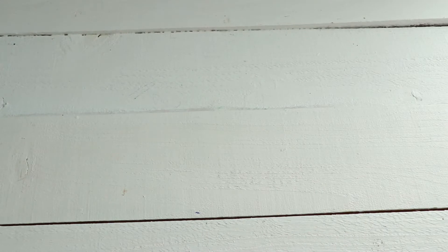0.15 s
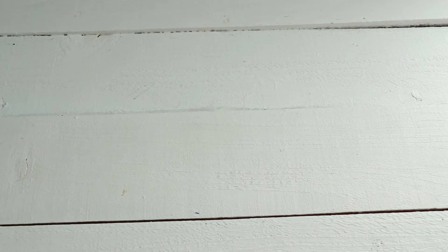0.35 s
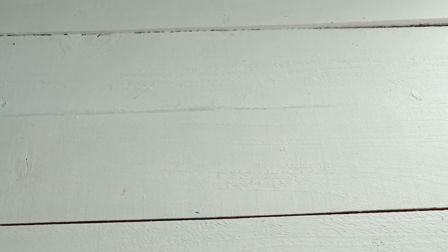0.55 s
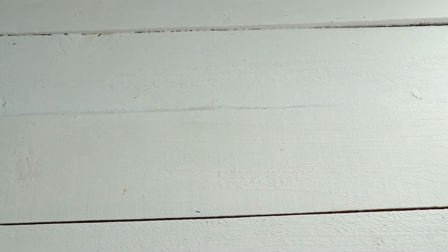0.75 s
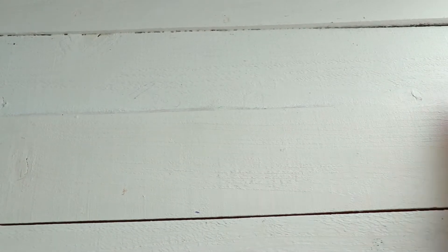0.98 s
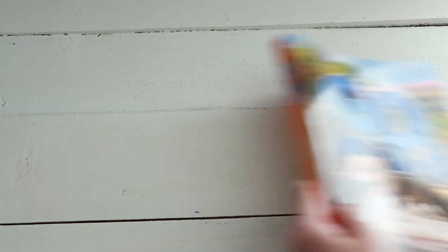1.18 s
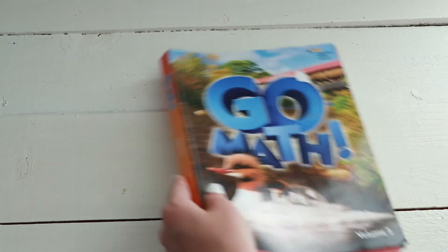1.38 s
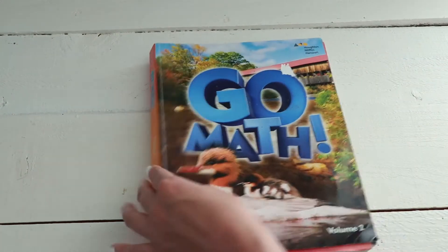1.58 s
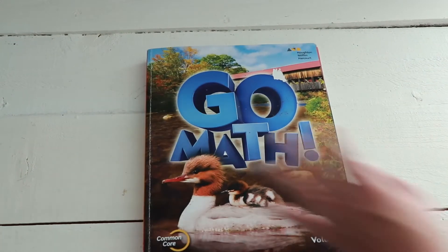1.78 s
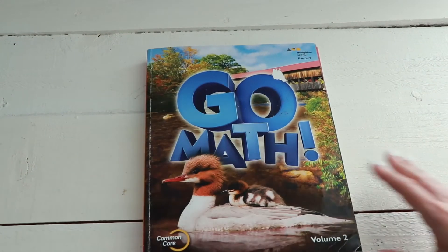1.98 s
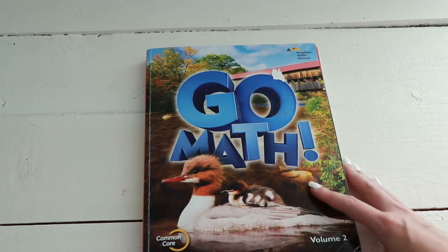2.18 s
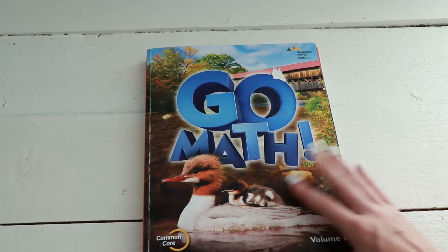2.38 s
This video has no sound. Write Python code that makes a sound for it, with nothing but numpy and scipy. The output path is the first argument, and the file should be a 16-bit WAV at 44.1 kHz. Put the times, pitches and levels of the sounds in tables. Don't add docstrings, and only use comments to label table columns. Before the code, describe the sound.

A thick paperback book is handled on a wooden plank table, close to a phone in a quiet room. Cover ticks lead to a hard thump and page slap at 0.2 s, with ticks until 0.5. A lighter knock comes at 0.8, a gritty stuttering drag around 1.1-1.3, a sharp snap at 1.47, a full woody set-down at 1.7, small taps near 2.25, and faint finger brushing from 2.4.

```python
import sys
import numpy as np
from scipy import signal
from scipy.fft import rfft, irfft
from scipy.io import wavfile
from scipy.ndimage import uniform_filter1d

SR = 44100
rng = np.random.default_rng(int(sys.argv[2]) if len(sys.argv) > 2 else 0)


def voltage_ratio(decibels):
    exponent = np.asarray(decibels, float) / 20
    return 10 ** exponent


def store_wav(level_fs):
    pcm = np.round(np.clip(np.atleast_2d(level_fs), -1, 1) * 32767)
    wavfile.write(sys.argv[1], SR, pcm.T.astype(np.int16))


N = 108045
LEAD = 2000

# mode_hz, level_db
PLANK_MODES = [(42, 24), (68, 0), (93, 7.5), (152, 2.5), (186, -7), (234, 1.5), (298, 3.5), (347, 5.5),
               (374, 1), (470, 2), (570, 3.5), (650, 5.5), (800, -0.5)]
# time_s, level_db, brightness (each unit lifts the treble above 2.8 kHz by 4
# dB)
DRAG_COURSE = [(0, -67.5, 0), (.3, -43, 1), (.37, -44, -0.3), (.52, -43.5, 2), (0.649, -46.5, 0.9),
               (.76, -51, -0.3), (.87, -49.5, 1), (.95, -43.5, 1), (1.111, -29.5, 0), (1.18, -26, 0.73),
               (1.25, -27.5, 0.27), (1.39, -40, 1), (1.485, -40, 1), (1.57, -50, 0), (1.95, -53.5, -0.5),
               (2.019, -46, -1), (2.13, -60.5, 0.4), (2.45, -56.5, 1)]


def unit(x):
    return x / np.sqrt(np.mean(x ** 2))


def noise():
    return rng.standard_normal((2, N))


def colour(x, points):
    hz, db = np.array(points).T
    f = np.maximum(np.arange(N // 2 + 1) * SR / N, 1)
    gain_db = np.interp(np.log(f), np.log(hz), db)
    return irfft(rfft(x) * voltage_ratio(gain_db), N)


def band(x, hz, width_hz):
    b, a = signal.iirpeak(min(hz, .45 * SR), hz / width_hz, fs=SR)
    return signal.lfilter(b, a, x)


def cut(x, hz, kind, order=1):
    sos = signal.butter(order, min(hz, .45 * SR), kind, fs=SR, output="sos")
    return signal.sosfilt(sos, x)


def walk(rate_hz):
    hold = int(SR / rate_hz)
    steps = np.repeat(rng.standard_normal(N // hold + 1), hold)
    return unit(uniform_filter1d(steps, hold))[:N]


def fade(t, t60_s):
    return (t >= 0) * np.exp(-np.log(1000) * np.maximum(t, 0) / t60_s)


def add(out, start_s, x):
    i = int(start_s * SR) - LEAD
    out[:, i:i + x.shape[1]] += x[:, :N - i]


def thumps():
    # start_s, peak_db, spot_hz, t60_s
    blows = [(.177, -32.5, 323, 0.21), (.223, -17, 710, 0.041), (.230, -18, 268, 0.13),
             (.240, -13, 363, 0.049), (.249, -16.5, 185, 0.059), (.265, -16, 204, 0.13),
             (0.275, -25.5, 71, 0.22), (0.311, -26, 190, 0.071), (0.409, -35.5, 45, 0.2),
             (0.8168, -24, 345, 0.049), (0.813, -29.5, 150, 0.097), (.837, -34, 345, 0.039),
             (1.086, -25.5, 61, 0.1), (1.098, -20, 233, 0.017), (1.49, -37.5, 152, 0.27),
             (1.529, -32.5, 348, 0.034), (1.555, -27.5, 360, 0.015), (1.563, -26, 340, 0.034),
             (1.615, -29, 358, .1), (1.645, -31.5, 345, 0.06), (1.706, -12.5, 175, 0.082),
             (1.712, -20.5, 543, 0.076), (1.714, -20, 353, 0.091), (1.722, -18.5, 188, 0.11),
             (1.753, -17.5, 446, 0.05), (1.761, -25, 95, 0.13), (1.78, -23.5, 380, 0.093),
             (1.791, -34.5, 74.7, 0.49), (1.763, -32, 156, .06), (1.787, -29, 155, 0.067),
             (1.809, -35.5, 155, 0.09), (2.05, -33, 191, 0.11), (1.818, -29.5, 353, 0.078),
             (1.848, -39, 246, .06), (1.97, -34.5, 95, .2), (1.999, -34.5, 157, 0.16),
             (2.236, -52, 160, 0.082)]
    out, t = np.zeros(N), np.arange(SR // 2) / SR
    hz, db = np.array(PLANK_MODES).T[:, :, None]
    lucks = rng.standard_normal((len(blows), len(PLANK_MODES), 1))
    for (start_s, peak_db, spot_hz, t60_s), luck in zip(blows, lucks):
        spread_octaves = 0.18 + 0.03 * max(peak_db + 27, 0)
        distance = np.log2(hz / spot_hz) / spread_octaves
        share = voltage_ratio(db + 2 * luck) * np.exp(-.5 * distance ** 2)
        modes = -np.sum(share * np.sin(2 * np.pi * hz * t), axis=0)
        ring = modes * fade(t, t60_s) * (1 - np.exp(-t * spot_hz * 2.5))
        i = int(start_s * SR)
        out[i:i + len(t)] += (voltage_ratio(peak_db) * ring / np.abs(ring).max())[:N - i]
    return out


def slaps(size=3300):
    # top_s, level_db, rise_s, t60_s, pitch_hz
    bursts = [(.178, -38, 0.00038, 0.037, 1610), (.2235, -25, 0.00045, 0.025, 5960),
              (.2235, -23, 0.00054, 0.25, 726), (.2318, -17.5, 0.00052, 0.016, 5000),
              (.252, -26, 0.0012, 0.2, 1500), (.253, -31.5, 0.0015, 0.042, 8000),
              (.31, -33.5, 0.033, 0.12, 1270), (.666, -33.5, 0.0033, 0.027, 1200),
              (.8045, -25, 0.00053, 0.019, 5540), (.805, -28.5, 0.00076, 0.23, 1720),
              (.858, -48, 0.0025, 0.13, 1490), (1.476, -35, 0.0024, 0.025, 3100),
              (1.705, -24, 0.0053, 0.045, 5700), (1.706, -24.5, 0.008, 0.029, 1470),
              (1.73, -45, 0.0078, 0.16, 4100), (1.757, -34.5, 0.0013, 0.053, 5000),
              (1.757, -30.5, 0.0019, 0.13, 640), (1.779, -36, 0.0034, 0.095, 1860),
              (2.2315, -45.5, 0.00071, 0.044, 4000), (2.296, -41, 0.0048, 0.074, 8900),
              (2.322, -50, 0.0095, 0.044, 7040), (.24, -33, 0.005, 0.29, 4370),
              (2.296, -45.5, 0.0074, 0.098, 3520), (.808, -35, .002, 0.11, 3600),
              (1.704, -35.5, .005, 0.096, 14000), (.8045, -43.5, 0.00077, 0.044, 13000),
              (2.02, -46, 0.042, 0.091, 1470), (.43, -42, 0.0076, .2, 1000)]
    slap_q = 1.18
    out, t = np.zeros((2, N)), (np.arange(SR // 3) - LEAD) / SR
    crackle = noise() * voltage_ratio(1.9 * walk(400))
    for k, (top_s, level_db, rise_s, t60_s, hz) in enumerate(bursts):
        air = band(crackle[:, k * size:][:, :len(t)], hz, hz / slap_q)
        air = cut(cut(air, 690, "high"), 0.38 * hz, "low")
        swell = np.exp(np.minimum(t, 0) / rise_s)
        add(out, top_s, voltage_ratio(level_db) * unit(air) * np.where(t < 0, swell, fade(t, t60_s)))
    return out


def ticks(size=3000):
    # start_s, peak_db, pitch_hz, pan_db
    cover_snaps = [(.049, -27, 12100, -16), (.070, -23, 7700, -7), (.072, -28.5, 3340, -15),
                   (.0935, -27, 11100, -18), (.117, -42, 11000, -5), (.1553, -21, 8050, -11),
                   (.2315, -5.5, 3960, -7), (.324, -22.5, 8000, -7), (.4265, -19.5, 8800, -10),
                   (.474, -19.5, 7800, -8), (.5135, -16, 8500, -7), (.55, -35, 9000, -8),
                   (1.473, -9, 5950, 5), (1.6375, -29, 2000, 0), (2.2245, -34, 8800, 0),
                   (1.7535, -21, 1500, 4), (1.778, -24, 1700, 0), (.1772, -28, 3500, 0),
                   (2.231, -20, 2500, 0), (.0505, -41, 4500, -13), (.086, -35, 9000, -4),
                   (.0955, -30.5, 4800, -8), (.114, -33, 8960, -6), (.128, -44, 13000, -8),
                   (.1995, -40, 13000, -8), (.2022, -38, 9000, -8)]
    out, t = np.zeros((2, N)), (np.arange(SR // 10) - LEAD) / SR
    hiss = unit(cut(cut(noise(), 2500, "high"), 7000, "low"))
    for k, (start_s, peak_db, hz, pan_db) in enumerate(cover_snaps):
        snap = np.sin(2 * np.pi * hz * t) * fade(t, 2.94 / hz) * 0.9
        rustle_gain = voltage_ratio(-26) * min(hz / 7000, 1) ** 2
        rustle = rustle_gain * hiss[:, k * size:][:, :len(t)] * fade(t, 0.058)
        left_right_db = np.array([[pan_db], [-pan_db]]) / 2
        add(out, start_s, voltage_ratio(peak_db + left_right_db) * (snap + rustle))
    return out


def catches():
    # start_s, peak_db, pitch_hz, t60_s
    rings = [(.2155, -35, 1490, 0.034), (.2303, -11.5, 450, 0.022), (.2345, -26, 970, .03),
             (.2495, -14, 314, 0.076), (.2605, -12.5, 218, 0.071), (.2228, -17, 750, 0.022),
             (.2565, -18, 1650, .03), (.27, -32, 960, 0.024), (.296, -27, 1415, 0.046),
             (.8035, -18, 1500, 0.023), (.81, -22, 1598, 0.037), (.8035, -30, 505, .03),
             (.856, -26.5, 1610, 0.021), (.8225, -20.5, 363, 0.088), (.2318, -18.5, 3920, 0.018),
             (1.12, -21.5, 1575, 0.072), (1.132, -24, 373, 0.061), (1.145, -19, 1097, 0.037),
             (1.17, -22, 1530, .03), (1.177, -20, 580, 0.02), (1.2, -24, 1620, 0.043),
             (1.211, -15, 705, 0.017), (1.227, -20.5, 682, 0.034), (1.237, -18, 852, 0.045),
             (1.6375, -28, 900, 0.009), (1.7535, -20.5, 636, 0.038), (1.232, -20, 1720, 0.025),
             (1.248, -18, 565, 0.031), (1.27, -20.5, 1320, 0.048), (1.298, -23.5, 700, 0.033),
             (1.332, -29, 740, .04), (1.698, -20, 1157, 0.025), (1.698, -26, 2186, 0.045),
             (1.7035, -25.5, 1580, 0.062), (1.704, -17.5, 730, 0.033), (1.734, -24, 570, 0.029),
             (1.741, -34, 1320, 0.023), (1.77, -34, 570, 0.024), (1.782, -27.5, 1434, 0.036),
             (1.8, -42, 650, .04)]
    out, t = np.zeros((2, N)), (np.arange(SR // 8) - LEAD) / SR
    late = np.maximum(t, 0)
    for (start_s, peak_db, hz, t60_s), luck in zip(rings, rng.standard_normal((len(rings), 1))):
        tone = np.sin(2 * np.pi * hz * late * (1 - 0.95 * late))
        ring = tone * fade(t, t60_s) * (1 - np.exp(-late * hz * 3))
        add(out, start_s, voltage_ratio(peak_db) * ring * np.array([[1], np.tanh(luck)]))
    return out


def drag(t):
    # freq_hz, level_db_per_hz
    paper_colour = [(60, -9.5), (250, -9.5), (700, -8), (1600, -6.5), (2500, -11.5), (6000, -20.5),
                    (10000, -28.5), (15000, -32.5)]
    # mode_hz, width_hz, level_db, tip_gain_db
    book_modes = [(345, 78, 2.5, -3), (460, 60, 1, 5.5), (650, 70, -4.5, 6.5), (794, 47, -6.5, 4),
                  (1000, 110, -5.5, -1.5), (1230, 150, -12.5, 1.5), (1510, 110, -10, -3.5)]
    grains_per_s, grain_spread_db, chatter_db = 16000, 0.56, 0.68
    book_db, book_waver_db = -10.5, 2.5
    tip_s, tip_span_s = 1.1, 0.02

    hits = rng.random(N) < grains_per_s / SR
    grains = hits * noise() * voltage_ratio(grain_spread_db * rng.exponential(size=N))
    chatter = voltage_ratio(chatter_db * walk(250) + 1.3 * walk(70))
    paper = unit(colour(grains * chatter, paper_colour))

    tipped = np.tanh((t - tip_s) / tip_span_s)
    book = np.zeros((2, N))
    for hz, width_hz, db, tip_db in book_modes:
        mode_db = db + tip_db * tipped + book_waver_db * walk(60.4)
        book += voltage_ratio(mode_db) * band(paper, hz, width_hz)

    time_s, level_db, tilt_db = np.array(DRAG_COURSE).T
    top = cut(paper, 2820, "high", order=2)
    paper = paper + top * (voltage_ratio(4 * np.interp(t, time_s, tilt_db)) - 1)
    return (paper + voltage_ratio(book_db) * unit(book)) * voltage_ratio(np.interp(t, time_s, level_db))


def rumble(t):
    level_db, drag_share, mode_q = -49, 0.25, 25.4
    time_s, drag_db, _ = np.array(DRAG_COURSE).T
    push = noise()
    hum = np.zeros((2, N))
    for hz, mode_db in PLANK_MODES[1:9]:
        mode = band(band(push, hz, hz / mode_q), hz, hz / 3)
        hum += voltage_ratio(mode_db + 2 * walk(12)) * unit(mode)
    return unit(hum) * voltage_ratio(level_db + drag_share * (np.interp(t, time_s, drag_db) + 46.0))


def brush(t):
    # level_db, top_hz
    fingertip = (-46, 3200)
    level_db, top_hz = fingertip
    start_s, swell_s = 2.405, .045
    hiss = cut(cut(noise(), top_hz, "low"), 1200, "high") * voltage_ratio(2.0 * walk(120))
    return voltage_ratio(level_db) * unit(hiss) * np.clip((t - start_s) / swell_s, 0, 1) ** .5


def room_answer(source):
    t60_s, delay_s, level_db, top_hz = 0.36, .006, -12.5, 5000
    t = np.arange(SR // 2) / SR
    tail = cut(rng.standard_normal((2, SR // 2)), top_hz, "low") * fade(t - delay_s, t60_s)
    energy = np.sum(tail ** 2, axis=1, keepdims=True)
    tail = cut(tail / np.sqrt(energy), 100, "high")
    return voltage_ratio(level_db) * signal.fftconvolve(source[None], tail)[:, :N]


def room_tone():
    # freq_hz, level_db_per_hz
    tone_colour = [(15, -42), (25, 1.5), (285, -9), (373, -19), (2760, -31), (2990, -33), (3250, -34),
                   (8360, -39), (16000, -58)]
    level_db = -47
    air = cut(colour(noise(), tone_colour), 35.6, "high", order=2)
    return voltage_ratio(level_db + 0.21 * walk(10.57)) * unit(air)


def scene():
    # freq_hz, level_db
    port_width = [(25, -11), (85, -22.5), (180, -14), (350, -14), (700, -6), (1400, -0.5), (3000, 1),
                  (16000, 0)]
    table_echo_s, table_echo_db = .0019, -12
    t = np.arange(N) / SR
    boom, claps, snaps = thumps(), slaps(), ticks()
    claps = claps + voltage_ratio(table_echo_db) * np.roll(claps, int(table_echo_s * SR), axis=1)
    near = claps + catches() + drag(t) + rumble(t) + brush(t)
    wet = room_answer(near[0] + boom + snaps.mean(axis=0))
    mid, side = near + wet + room_tone()
    side = colour(side + np.roll(boom, 40), port_width)
    return snaps + boom + mid + side * np.array([[1], [-1]])


def band_limit(x):
    return signal.sosfilt(signal.butter(12, 17000, fs=SR, output="sos"), x)


def record(dry):
    top_hz = 15700
    top_cut = signal.ellip(8, .2, 50, top_hz, fs=SR, output="sos")
    mix = cut(signal.sosfilt(top_cut, dry), 25, "high", order=2)
    return band_limit(mix)


dry = scene()
out = record(dry)
store_wav(out)
```